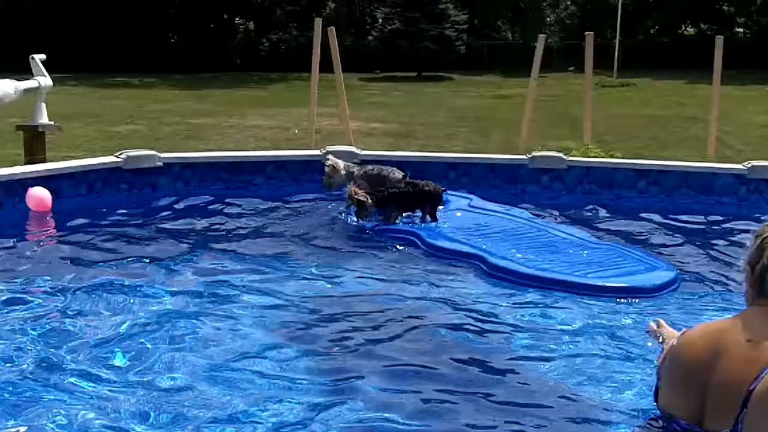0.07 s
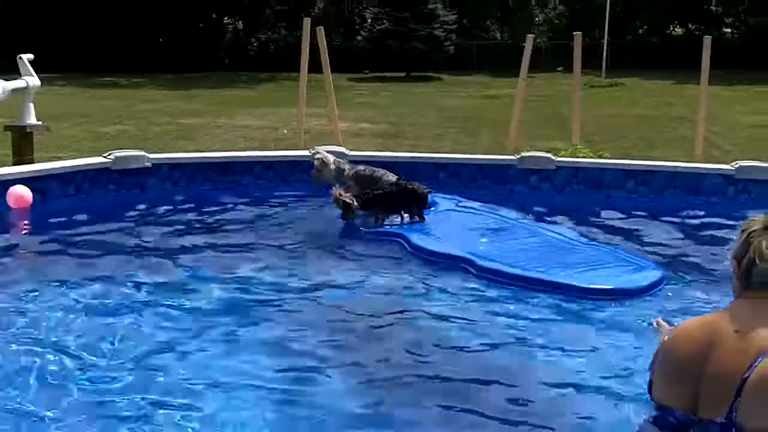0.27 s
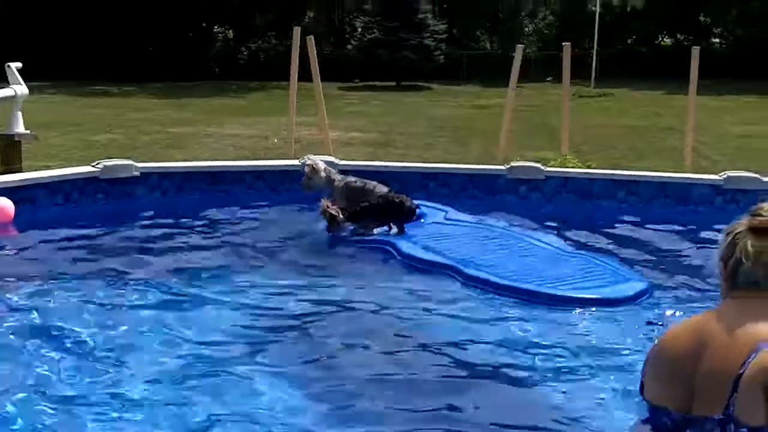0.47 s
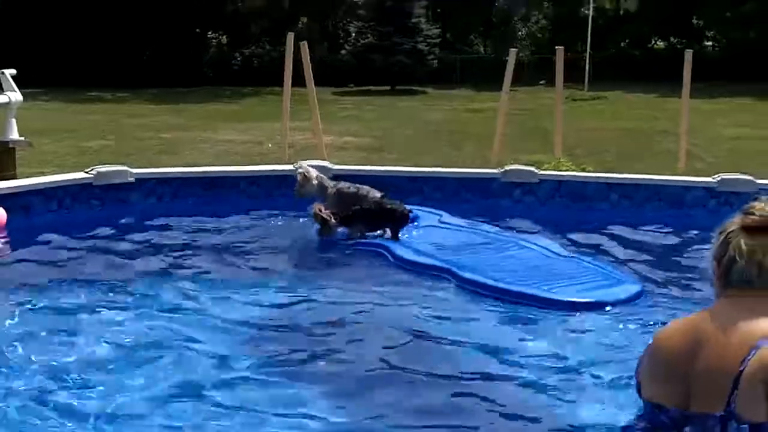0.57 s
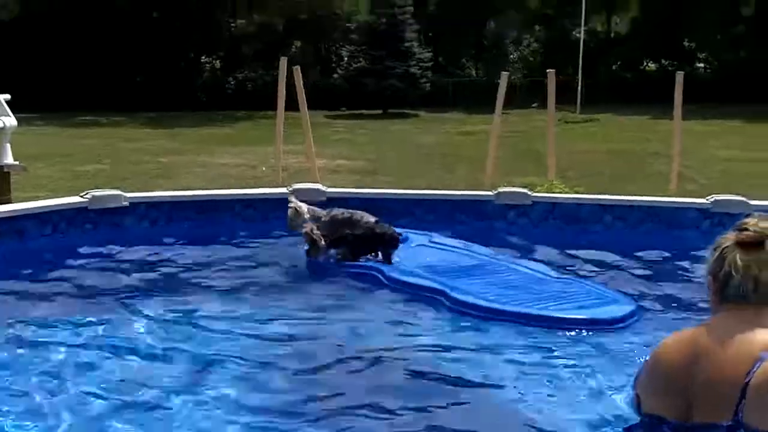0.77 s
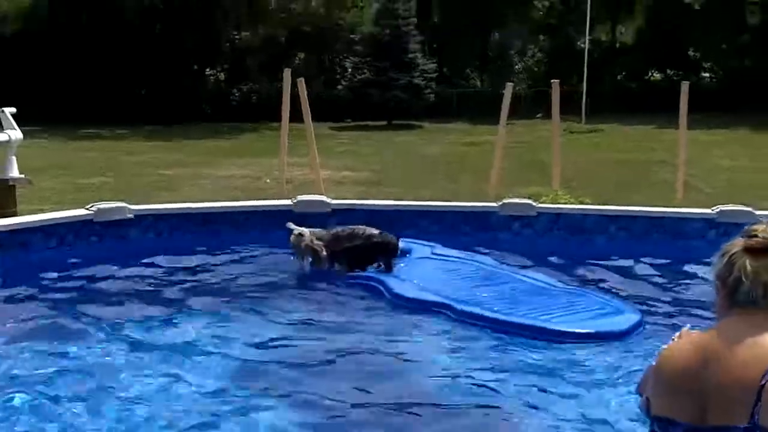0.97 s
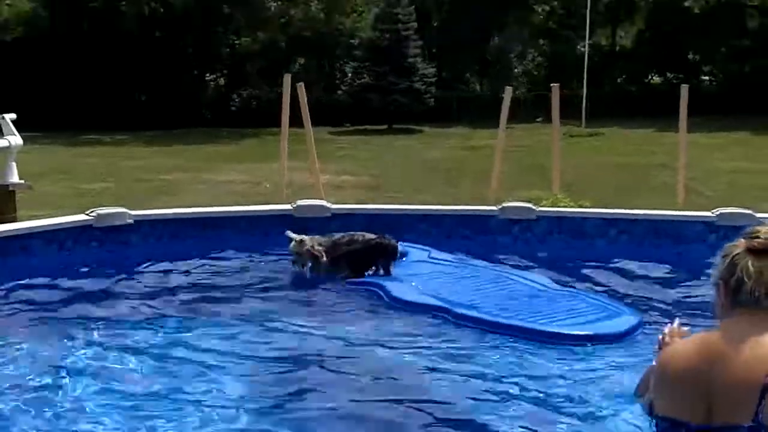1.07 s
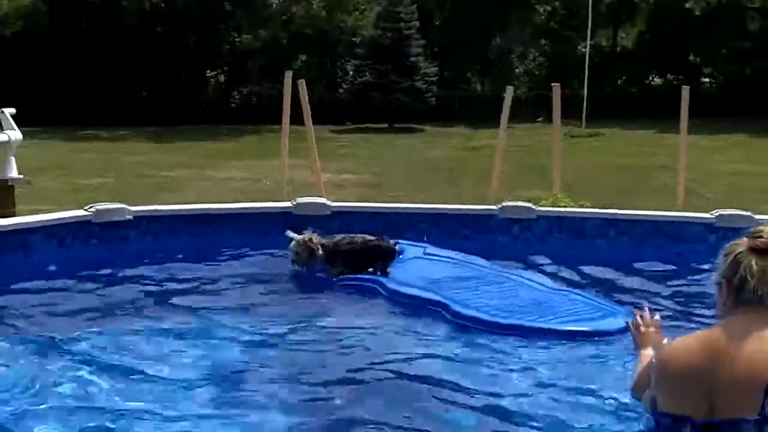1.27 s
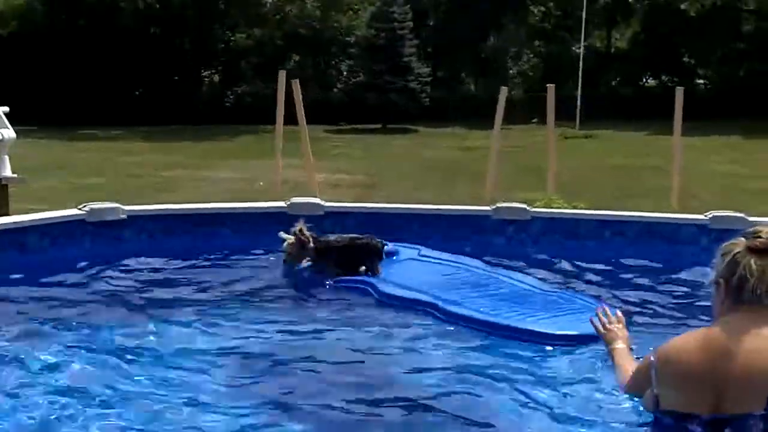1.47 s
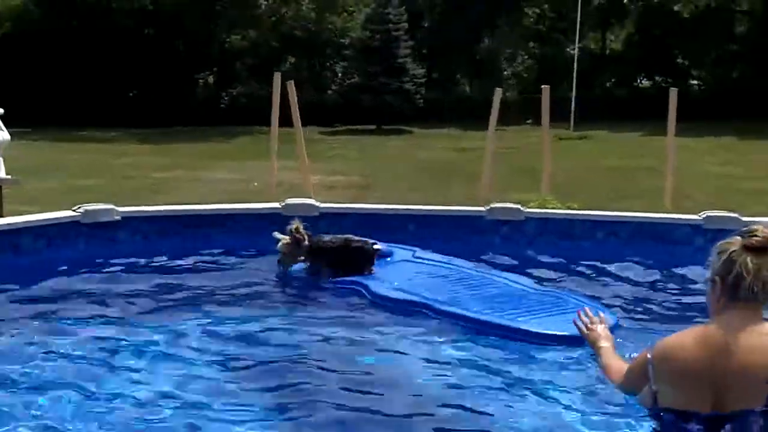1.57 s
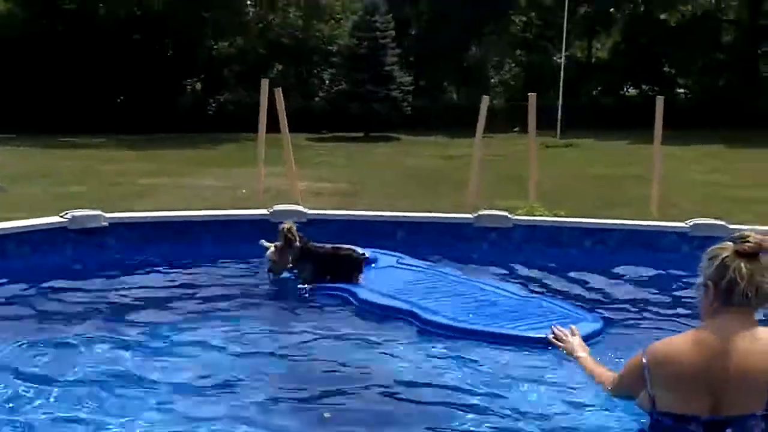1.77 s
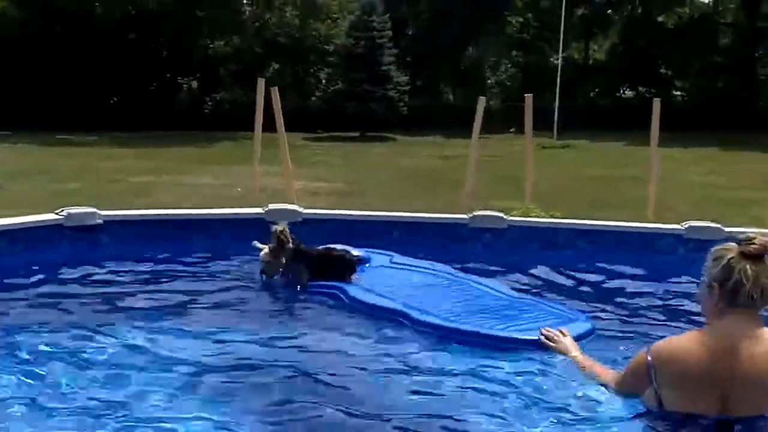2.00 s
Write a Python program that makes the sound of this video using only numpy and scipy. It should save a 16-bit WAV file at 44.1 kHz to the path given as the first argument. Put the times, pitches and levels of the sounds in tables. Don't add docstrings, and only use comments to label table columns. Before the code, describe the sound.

Light watery gurgles, drips and gentle lapping in a garden pool, with a faint engine rumbling far off

```python
import sys
import numpy as np
from scipy import signal
from scipy.fft import rfft, irfft
from scipy.io import wavfile
from scipy.ndimage import uniform_filter1d

SR = 44100
rng = np.random.default_rng(int(sys.argv[2]) if len(sys.argv) > 2 else 0)


def dump(signal):
    limited = np.clip(np.atleast_2d(signal).T, -1, 1)
    pcm = np.round(limited * 32767).astype(np.int16)
    wavfile.write(sys.argv[1], SR, pcm)


def gain_from_db(level_db):
    decades = np.asarray(level_db, float) / 20
    return 10 ** decades


N = 89787

# (frequency [Hz], level [dB])
LAP = [(76, -8), (130, -1), (168, -8), (234, -4), (469, -16.5), (546, -15), (607, -15), (1060, -19.5),
       (4800, -47.5), (6240, -83), (10600, -120)]


def evened(x):
    return x / np.sqrt(np.mean(x ** 2) + 1e-20)


def read(points, hz):
    f, value = np.transpose(points)
    return np.interp(np.log(hz + 1), np.log(f + 1), value)


def follow(curve):
    s, db = np.transpose(curve)
    return gain_from_db(np.interp(np.arange(N) / SR, s, db - db.mean()))


def add(mix, s, sound):
    part = mix[round(s * SR):][:len(sound)]
    part += sound[:len(part)]


def resonate(x, hz, width_hz):
    turn = np.exp(2j * np.pi * hz * np.arange(len(x)) / SR)
    r = np.exp(-np.pi * width_hz / SR)
    for _ in range(2):
        x = 2 * (turn * signal.lfilter([1 - r], [1, -r], x / turn)).real
    return x


def colour(x, gain_db):
    spectrum = rfft(np.r_[x, x[::-1]])
    gain = gain_from_db(gain_db(np.fft.rfftfreq(2 * N, 1 / SR)))
    return irfft(spectrum * gain, 2 * N)[:N]


def noise(points, patchy_db, skirt_db):
    a, b, patches = rng.standard_normal((N // 256 + 5, 513, 3)).T
    patches = uniform_filter1d(patches, size=10, axis=0)
    patches = evened(uniform_filter1d(patches, size=8, axis=1))
    spectra = (a + 1j * b) * gain_from_db(patchy_db * patches)
    x = signal.istft(spectra, nperseg=1024, noverlap=768)[1][:N]

    def gain_db(f):
        inside = np.clip(f, points[0][0], points[-1][0])
        octaves_beyond = abs(np.log2((f + 1) / (inside + 1)))
        return read(points, f) + skirt_db * octaves_beyond

    return evened(colour(x, gain_db))


def slow(*sizes):
    v = rng.standard_normal(N)
    for size in sizes:
        v = uniform_filter1d(v, size=size)
    return evened(v)


def ring(db, hz, t60, rise_per_s, onset_s):
    t = np.arange(0, t60 + onset_s, 1 / SR)
    decay = gain_from_db(db - 60 * np.maximum(t - onset_s, 0) / t60)
    shape = np.minimum(t / onset_s, 1) * decay
    return shape * np.sin(2 * np.pi * hz * (t + rise_per_s * t ** 2 / 2))


def air_hiss():
    # (frequency [Hz], level [dB])
    hiss = [(3000, -2.5), (6500, 1), (8000, 0), (9100, -1), (9500, -7.5), (11000, -9.5)]
    # (frequency [Hz], level [dB])
    air = [(11000, -5), (13000, 2), (14900, -4)]
    out = gain_from_db(-75.5) * noise(hiss, patchy_db=3.0, skirt_db=-27)
    return out + gain_from_db(-89) * noise(air, patchy_db=1.5, skirt_db=-200)


def distant_engine():
    # (frequency [Hz], level [dB])
    rumble = [(7.1, -35), (12, 0.5), (23, -6.5), (43, -21.5), (88, -13), (118, -18.5), (160, -22.5),
              (210, -60), (350, -120)]
    # (pitch [Hz], level [dB rms], wander [Hz])
    drone = [(24.96, -55, 5.1), (56.67, -51, 4.8), (85.1, -55.5, 1.76), (119.24, -55.5, 3.9)]
    # (time [s], level [dB])
    swell = [(0.2, -47.5), (0.224, -47), (0.368, -42.5), (0.52, -48.5), (0.546, -45.5), (1.708, -44),
             (1.734, -46.5), (1.866, -41.5), (2.03, -45)]
    engine = gain_from_db(-47) * noise(rumble, patchy_db=-1.1, skirt_db=-35)
    for hz, level_db, wander_hz in drone:
        drift, throb = slow(2500, 1500), slow(2500, 1500)
        phase = 2 * np.pi * np.cumsum(hz + wander_hz * drift / 2) / SR
        engine = engine + gain_from_db(level_db + 4 + 1.83 * throb) * np.sin(phase)
    return follow(swell) * engine


def pump_whine():
    # (time [s], pitch [Hz], level [dB])
    whine = [(.2, 538, -64), (.45, 560, -63), (.6, 550, -63), (.75, 535, -63), (1.1, 545, -63),
             (1.25, 540, -64), (1.47, 545, -62), (1.72, 555, -62), (2.03, 548, -64)]
    s, hz, db = np.transpose(whine)
    t = np.arange(N) / SR
    drift, throb = slow(3000), slow(3000)
    phase = 2 * np.pi * np.cumsum(np.interp(t, s, hz) + 1.53 * drift) / SR
    return gain_from_db(np.interp(t, s, db) + 4.5 + 0.8 * throb) * np.sin(phase)


def crickets():
    # (time [s], level [dB])
    trill = [(.16, -100), (.7, -93), (1.15, -91), (1.4, -86), (1.85, -85), (2.04, -87)]
    trill_hz, fall_hz, chirps_per_s, first_s = 8980, 244, 59.9, 0.0075
    t = np.arange(N) / SR
    s, db = np.transpose(trill)
    turns = chirps_per_s * (t - first_s)
    chirp = np.round(turns).astype(int)
    phase, size = rng.standard_normal((200, 2)).T
    hz = trill_hz - fall_hz * 2 * (turns - chirp)
    tone = np.sin(2 * np.pi * (np.cumsum(hz) / SR + 0.22 * phase[chirp]))
    near = abs(np.cos(np.pi * turns)) ** 6.1 * gain_from_db(1.3 * size[chirp]) * tone
    far = resonate(rng.standard_normal(N), hz=8500, width_hz=150)
    return gain_from_db(np.interp(t, s, db)) * evened(near) + gain_from_db(-92) * evened(far)


def lapping():
    # (time [s], level [dB])
    stir = [(.16, -1.5), (.3, -1), (.45, -1), (.7, -1.1), (1.0, -1), (1.3, -1.44), (1.45, -2.7),
            (1.6, -1.5), (1.75, -1.5), (2.04, -0.6)]
    return follow(stir) * gain_from_db(-48.5) * noise(LAP, patchy_db=1.5, skirt_db=-7)


def fizz():
    bubbles_per_s, spread_db = 900, 2.5
    out = np.zeros(N)
    kind = rng.integers(0, 24, N)
    starts = rng.random(N) < bubbles_per_s / SR
    size = gain_from_db(spread_db * np.minimum(rng.exponential(1, N), 4)) * starts
    for k, hz in enumerate(np.geomspace(250, 4500, num=24)):
        db = 0.65 * read(LAP, hz) + 2.35 * np.log2(hz / 250)
        bubble = ring(db, hz, t60=14 / hz, rise_per_s=0.0051 * hz, onset_s=0.00088)
        out += signal.oaconvolve(size * (kind == k), bubble)[:N]
    return gain_from_db(-62) * evened(out)


def slops():
    # (time [s], length [s], level [dB], centre [Hz], width [Hz])
    bursts = [(0.246, 0.051, -54, 540, 490), (.461, 0.0095, -52, 950, 1020),
              (1.013, 0.013, -65.5, 2220, 600), (1.061, 0.013, -70, 2560, 1980),
              (1.079, 0.039, -69.5, 3700, 2200), (1.479, 0.054, -51.5, 473, 560),
              (1.588, .055, -50, 450, 500), (1.586, 0.03, -61, 1150, 400), (1.648, 0.025, -60, 700, 400),
              (1.655, .03, -72, 2500, 1500), (1.93, .05, -55, 503, 510), (0.299, .1, -52, 96, 50),
              (.96, .07, -66.5, 1900, 1000), (1.1, .025, -73.5, 4100, 1200), (1.663, .016, -69, 3300, 2200),
              (1.578, .016, -68, 2700, 2000)]
    out = np.zeros(N)
    for s, length, db, hz, width_hz in bursts:
        u = np.linspace(0, 1, round(length * SR))
        burst = resonate(rng.standard_normal(6000), hz, width_hz)[-len(u):]
        add(out, s, gain_from_db(db) * np.sin(np.pi * u ** 0.47) * evened(burst))
    return out


def spray_ticks():
    # (time [s], peak [dB], centre [Hz], width [Hz])
    ticks = [(0.2178, -48, 7400, 890), (.2178, -50, 6250, 695), (0.218, -55, 4700, 800),
             (0.223, -65, 6240, 300), (.224, -73, 8250, 500), (.164, -71, 7200, 400),
             (.313, -64, 3600, 2500), (0.57, -64, 4700, 1200), (1.584, -58, 3900, 900),
             (.6186, -48, 6800, 2500), (.6186, -55, 10500, 3500), (1.165, -64, 5000, 3000),
             (1.062, -54, 2600, 1500), (.465, -50, 2000, 1500), (1.0795, -60, 3500, 1500),
             (1.082, -61, 4300, 900), (1.094, -64, 4600, 800), (1.185, -59, 2200, 1200),
             (1.46, -60, 2500, 1200), (1.4928, -59, 7100, 600), (1.556, -58, 3900, 1400),
             (1.56, -69, 3600, 1500), (1.635, -64, 7500, 500), (1.635, -62, 6700, 600),
             (1.6425, -70, 6800, 500), (1.6532, -52, 3000, 2000), (1.6581, -48, 3000, 2000),
             (1.6581, -55, 4500, 1500), (1.6583, -56, 7500, 600), (1.66, -53.5, 6900, 500),
             (1.659, -64, 10400, 2500), (1.666, -59, 6800, 500), (1.665, -56, 4000, 1400),
             (1.6695, -63, 7200, 700), (1.672, -61, 2700, 1200), (1.675, -62, 2500, 1500),
             (1.746, -58, 3000, 1200), (1.909, -58, 3080, 900)]
    out = np.zeros(N)
    t = np.arange(0, 0.012, 1 / SR)
    for s, db, hz, width_hz in ticks:
        u = np.pi * width_hz * t
        add(out, s, gain_from_db(db) * (u * np.exp(1 - u)) ** 2 * np.sin(2 * np.pi * hz * t))
    return out


def drips():
    # (time [s], peak [dB], start pitch [Hz], 60 dB decay [s])
    drops = [(.2325, -64, 3800, .01), (.239, -69, 3850, .008), (0.275, -66, 1960, 0.012),
             (0.312, -67, 1690, .015), (.4635, -56, 3400, 0.02), (.462, -60, 2200, 0.0065),
             (0.524, -60.5, 2570, 0.027), (.967, -56, 1930, 0.025), (1.006, -57, 1235, 0.024),
             (1.011, -54.5, 1770, .03), (1.032, -56, 2670, .02), (1.036, -51.5, 2800, 0.011),
             (1.062, -53, 1824, 0.018), (1.0672, -51, 2000, 0.008), (1.066, -61, 3740, 0.0059),
             (1.089, -64, 3600, 0.012), (1.024, -60, 2100, .015), (1.003, -62, 2560, .012),
             (1.016, -60, 2240, .012), (1.095, -60, 2040, 0.045), (1.109, -64, 4140, 0.02),
             (1.582, -53, 2050, 0.0067), (1.644, -46, 1350, 0.011), (1.657, -50.5, 1770, 0.006),
             (1.665, -61.5, 3560, 0.018), (1.624, -52, 940, 0.017), (1.908, -59, 2230, .01),
             (1.905, -51, 980, 0.033)]
    out = np.zeros(N)
    for s, db, hz, t60 in drops:
        add(out, s, ring(db, hz, t60, rise_per_s=9.2, onset_s=0.0014))
    return out


def gurgles():
    # (time [s], peak [dB], pitch [Hz], 60 dB decay [s])
    pockets = [(.194, -38, 391, 0.057), (.245, -37.5, 366, 0.058), (.261, -46, 530, 0.04),
               (.234, -40, 205, .07), (.263, -42, 230, .07), (.343, -40, 215, .07), (.373, -46, 205, .05),
               (.176, -39, 125, .05), (.606, -39, 105, .06), (.35, -35.5, 100, 0.14),
               (.462, -39.5, 318, 0.048), (.4645, -42, 600, 0.015), (.47, -46, 503, 0.04),
               (0.44, -44.5, 313, 0.066), (.54, -46, 480, .03), (.536, -36, 353, 0.047),
               (0.82, -42.5, 236.4, 0.15), (1.151, -39, 1318, 0.052), (1.164, -44, 630, 0.05),
               (1.174, -46, 700, .04), (1.4, -42, 312, 0.028), (1.482, -49, 760, 0.03),
               (1.495, -46, 450, 0.057), (1.512, -44, 380, 0.025), (1.587, -37.5, 755, 0.061),
               (1.587, -40, 460, 0.044), (1.598, -38.5, 750, 0.047), (1.597, -41, 450, 0.05),
               (1.587, -39, 215, 0.093), (1.608, -37, 225, 0.12), (1.604, -42, 335, 0.043),
               (1.628, -41, 300, .04), (1.61, -41, 660, .04), (1.61, -44, 480, .05),
               (1.618, -39.5, 228, 0.051), (1.27, -49.5, 395, .06), (1.909, -38.5, 743, 0.065),
               (1.910, -45, 650, .04), (1.922, -45, 745, 0.09), (1.935, -45, 485, 0.08),
               (1.791, -44, 185, .07) , (1.16, -40, 168.7, 0.13)]
    out = np.zeros(N)
    for s, db, hz, t60 in pockets:
        add(out, s, ring(db, hz, t60, rise_per_s=0.5, onset_s=1.19 / hz))
    return out


def scene():
    # (frequency [Hz], side minus mid [dB])
    port_width = [(60, -29), (130, -48), (290, -50.5), (640, -43.5), (1410, -30), (3090, -16), (6800, -31),
                  (15000, -4)]
    garden = air_hiss() + distant_engine() + pump_whine() + crickets()
    water = lapping() + fizz() + slops() + spray_ticks() + drips() + gurgles()
    mid = garden + water
    scrambled = irfft(rfft(mid) * np.exp(2j * np.pi * rng.random(N // 2 + 1)), N)
    side = colour(scrambled, lambda f: read(port_width, f))
    return np.array([mid + side, mid - side])


def fray_treble(x):
    # (start [s], length [s], edge [Hz])
    dropouts = [(.335, .03, 10200), (0.503, .025, 12500), (0.889, .11, 12500), (1.152, .025, 10500),
                (1.275, .11, 11800), (1.51, .05, 11000), (1.69, .035, 11500), (1.814, .04, 12490)]
    edge_hz, jitter_hz, sparse_from_hz, sparse_keep, cut_db = 14700, 500, 10000, 0.05, -24
    hz, t, z = signal.stft(x, SR, nperseg=2048)
    edge = edge_hz + jitter_hz * rng.uniform(-2, 1, len(t))
    for start, length, low_edge_hz in dropouts:
        edge = np.where((t > start) & (t < start + length), low_edge_hz, edge)
    height = np.clip((hz[:, None] - sparse_from_hz) / (edge_hz - sparse_from_hz), 0, 1)
    share = sparse_keep ** height
    kept = (rng.random((len(t), len(hz))).T < share) & (hz[:, None] < edge)
    gain = np.where(kept, share ** -0.5, gain_from_db(cut_db))
    return signal.istft(z * gain, SR, nperseg=2048)[1][:, :N]


def top_cut(x):
    return signal.sosfilt(signal.butter(12, 15560, fs=SR, output="sos"), x)


def record(dry):
    offsets = [
        [0.0076],
        [0.0096],
    ]
    notch_hz, notch_width_hz, notch_db = 5465, 1010, -19.5
    open_s, ramp_s = 0.1573, 0.000057

    def notch(f):
        return notch_db * np.exp(-abs(f - notch_hz) / notch_width_hz * 2)

    housed = np.array([colour(channel, notch) for channel in dry])
    heard = fray_treble(housed) + offsets
    opening = np.clip((np.arange(N) / SR - open_s) / ramp_s, 0, 1)
    return top_cut(heard * opening)


dry = scene()
out = record(dry)
dump(out)
```